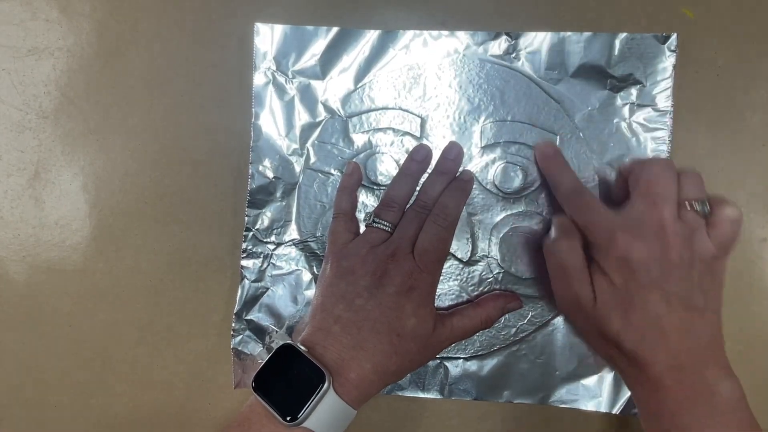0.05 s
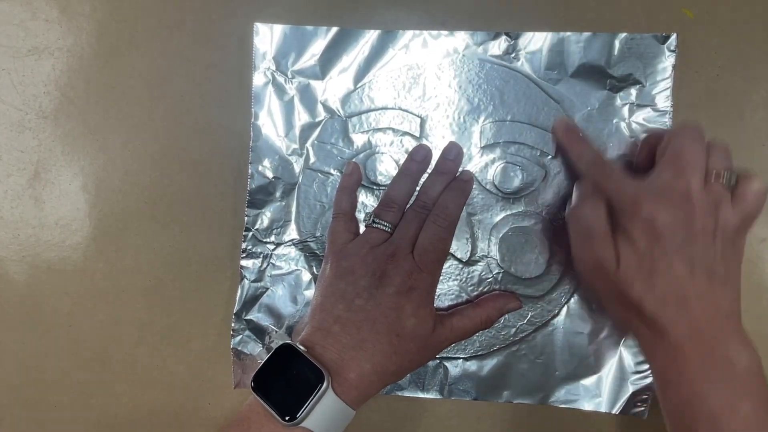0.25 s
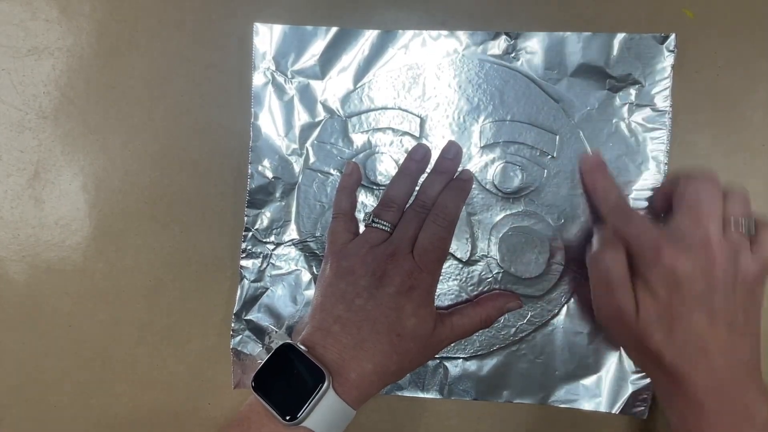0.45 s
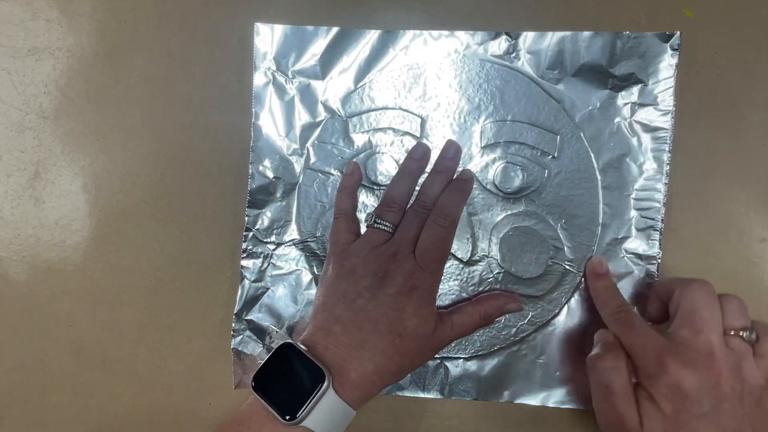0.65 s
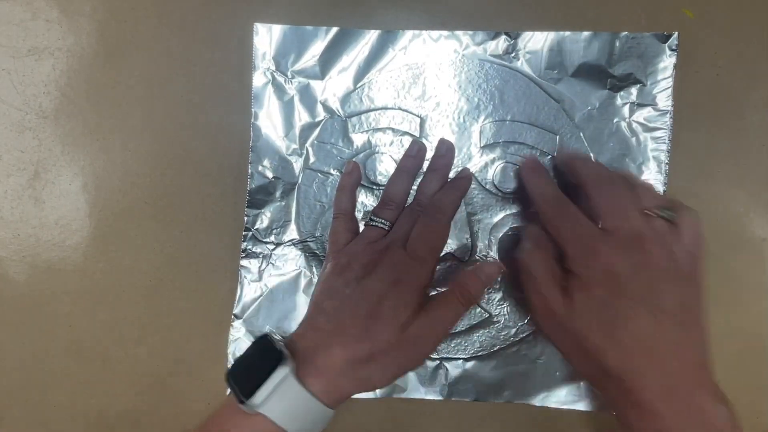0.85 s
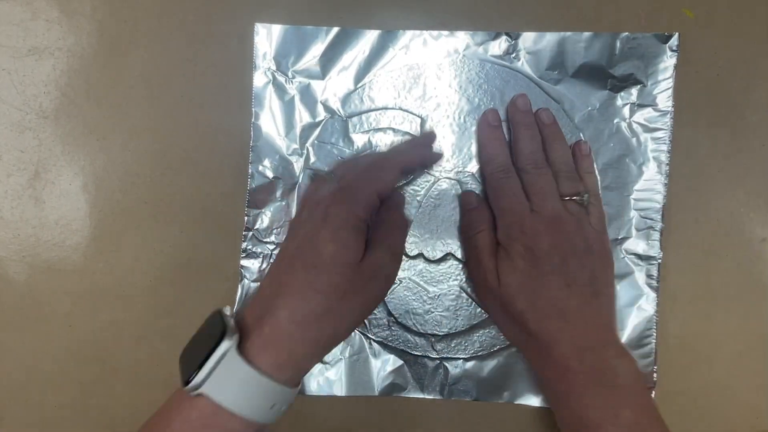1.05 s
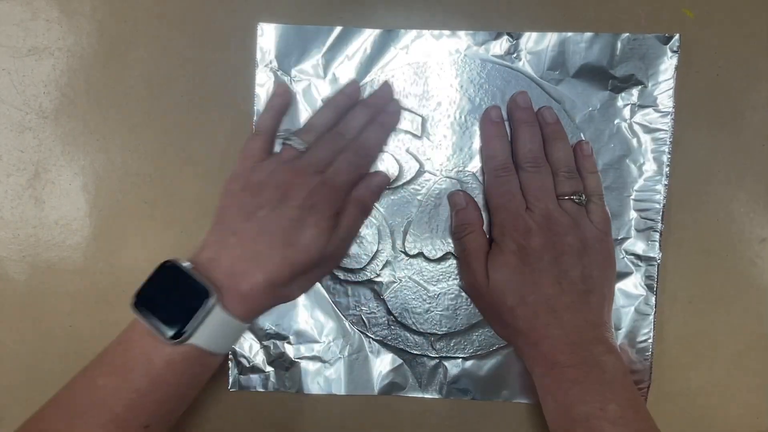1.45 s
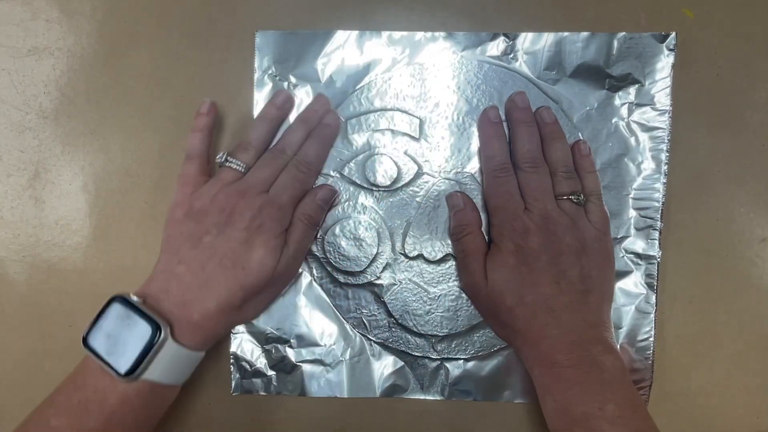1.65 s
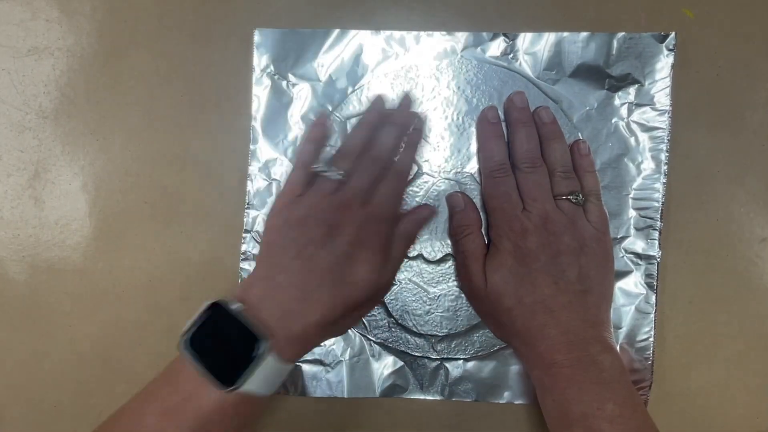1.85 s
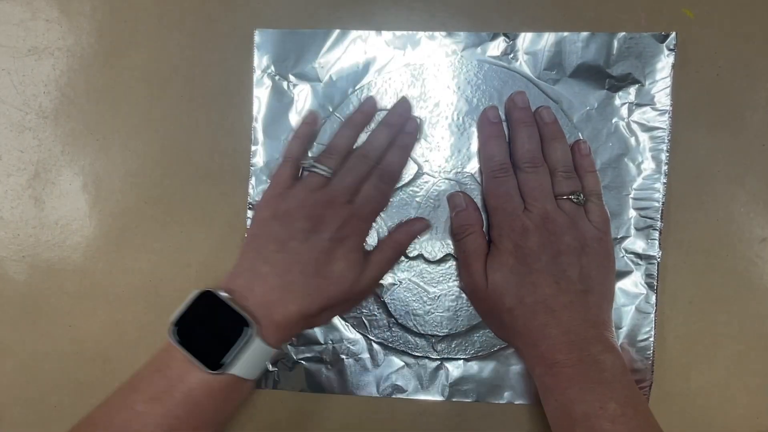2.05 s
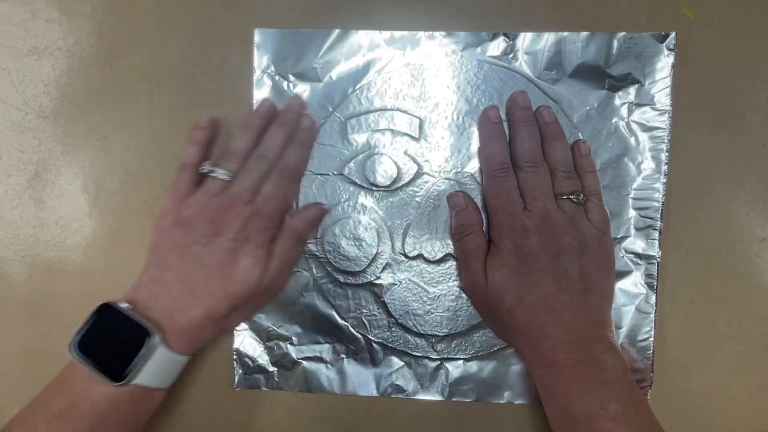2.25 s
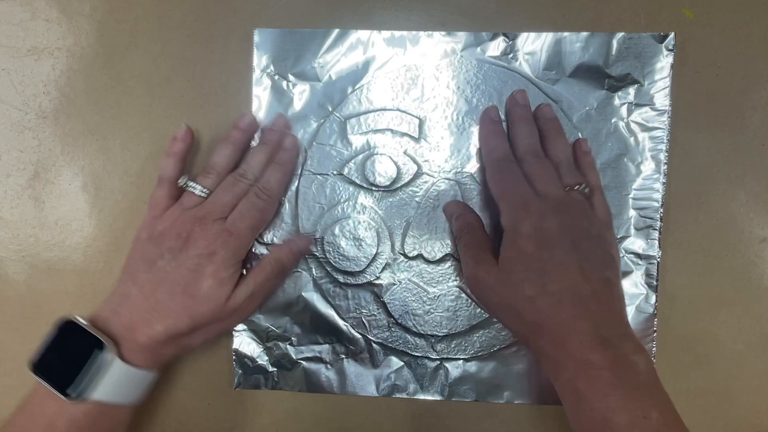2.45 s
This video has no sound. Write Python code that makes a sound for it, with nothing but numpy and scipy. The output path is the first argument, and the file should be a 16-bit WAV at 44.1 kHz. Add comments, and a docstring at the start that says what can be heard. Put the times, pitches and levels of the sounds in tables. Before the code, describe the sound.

Close by in a small, quiet room, foil crinkles under hands rubbing it over a plate in several short strokes. Sharp crackles come throughout, while the table beneath gives an early knock, brief low judders and soft scuffs.

```python
"""Aluminium foil crackles as fingers press and smooth it over a relief plate on a table.
Creases buckle with bright snaps, and skin sliding on the foil makes a fine fizz of tiny slips.
Through the plate the table top knocks, scuffs and judders under the hands.
The room is small and quiet, and two microphone openings listen from close by."""
import sys
import numpy as np
from scipy import signal
from scipy.fft import rfft, irfft
from scipy.io import wavfile

SR = 44100
rng = np.random.default_rng(int(sys.argv[2]) if len(sys.argv) > 2 else 0)


def bounce(signal):
    """Save signal as a 16-bit WAV file at the path given by the first command-line argument."""
    frames = np.transpose(np.atleast_2d(signal))
    limited = np.clip(frames, -1, 1)
    pcm = np.round(limited * 32767).astype(np.int16)
    wavfile.write(sys.argv[1], SR, pcm)


N = 114660


def amp(db):
    """Turns decibels into a number to multiply by."""
    return 10 ** (np.asarray(db) / 20)


def unit_level(x):
    """Scales a signal to an average (rms) level of 1."""
    return x / np.sqrt(np.mean(x ** 2) + 1e-20)


def read_curve(points, hz):
    """Looks up a value between the listed pitches."""
    pitch_hz, value = np.transpose(points)
    return np.interp(np.log(hz + 1), np.log(pitch_hz + 1), value)


def add(mix, start_s, sound):
    """Mixes a sound in at start_s, cutting off what does not fit."""
    at = round(start_s * SR)
    sound = sound[max(-at, 0):]
    part = mix[max(at, 0):][:len(sound)]
    part += sound[:len(part)]


def colour(x, points):
    """Makes some pitches stronger than others; white noise keeps its overall level."""
    size = 4096
    log_gain = np.log(amp(read_curve(points, abs(np.fft.fftfreq(size, 1 / SR)))))
    response = np.exp(np.conj(signal.hilbert(log_gain)))  # rings after a click, never before
    taps = np.fft.ifft(response).real[:size // 2]
    return signal.oaconvolve(x, taps / np.linalg.norm(taps))[:len(x)]


def band(x, centre_hz, octaves):
    """Keeps only the pitches near centre_hz."""
    hz = np.fft.rfftfreq(len(x), 1 / SR) + 1
    bell = np.exp(-.5 * (np.log2(hz / centre_hz) / octaves) ** 2)
    return irfft(rfft(x) * bell, len(x))


def drift(step_s):
    """Glides to a new random value every step_s."""
    values = rng.standard_normal(N)
    return unit_level(np.interp(np.arange(N) / SR / step_s, np.arange(N), values))


def slips(per_s, spread_db):
    """Tiny clicks of uneven size at random times."""
    size = amp(spread_db * np.minimum(rng.exponential(1, N), 5))
    sign = rng.choice([-1., 1.], N)
    happens = rng.random(N) < per_s / SR
    return unit_level(size * sign * happens)


def push(length_s, rise_s):
    """The loudness of one push: a quick rise and a steady fade."""
    t = np.arange(0, length_s, 1 / SR)
    return np.minimum(t / rise_s, 1) * (1 - t / length_s)


# The tone of the quiet room: pitch_hz, relative_db
ROOM_COLOUR = [(20, -28.5), (58, 3), (80, -10), (240, -16.5), (340, -27), (700, -36.5), (2000, -46),
               (2350, -30.5), (2700, -45), (11000, -40.5), (14000, -62.5)]

def room_tone():
    """A faint, steady rumble and hiss."""
    return amp(-63.5) * colour(rng.standard_normal(N), ROOM_COLOUR)


# How long the echo takes to fade by 60 dB: pitch_hz, fade_s
ECHO_FADES = [(100, 0.043), (3000, 0.21), (14000, 0.02)]

def room_echo(x, rise_s=0.00079):
    """The room adds a short blur of echoes, each pitch fading at its own speed."""
    hz, times, noise = signal.stft(rng.standard_normal(SR // 2), SR, nperseg=256)
    fade = amp(-60 * times / read_curve(ECHO_FADES, hz)[:, None])
    tail = signal.istft(noise * fade, SR)[1]
    tail *= np.minimum(np.arange(len(tail)) / SR / rise_s, 1) ** 2
    return signal.fftconvolve(x, tail / np.linalg.norm(tail))[:N]


# How loud the palms are: time_s, level_db
PALM_LEVELS = [(.2, -61.5), (.42, -53.5), (.55, -57.5), (0.898, -58), (1.25, -62), (1.621, -59.5),
               (1.85, -80), (2.05, -54), (2.451, -57.5), (2.6, -78.5)]
# Their dull tone: pitch_hz, relative_db
PALM_COLOUR = [(20, -33.5), (50, -1.5), (125, 3), (250, -8.5), (450, -15), (620, -15.5), (850, -23),
               (4000, -69)]

def palms():
    """Palms moving on the table make a low rumble."""
    level = amp(np.interp(np.arange(N) / SR, *np.transpose(PALM_LEVELS)))
    return level * colour(rng.standard_normal(N), PALM_COLOUR)


# Rough scrapes that ring the table, mostly the plate dragging on it; the rows at 1.029 s and 1.611 s are hands
# bumping the plate, and the row at 1.313 s is a low overtone of the finger judder there: start_s, length_s,
# level_db, pitch_hz, width_octaves
TABLE_SCUFFS = [(0.058, 0.11, -55.5, 925, 0.35), (0.229, 0.24, -52, 405, 0.27),
                (0.23, 0.49, -57, 840, 0.52), (1.029, 0.027, -54, 220.3, 0.17),
                (1.313, 0.12, -57, 237, 0.13), (1.611, 0.15, -57, 262, 0.62),
                (1.994, 0.47, -62.5, 1124, .13), (2.155, 0.17, -47, 192, 0.32),
                (2.156, 0.15, -40.5, 441, 0.3), (2.205, 0.11, -39.5, 535, 0.36)]

def table_scuffs():
    """Coarse slips make the table ring with a rough pitch: mostly the plate shifting, sometimes a hand bump or
    a judder's overtone."""
    out = np.zeros(N)
    for start_s, length_s, level_db, pitch_hz, width_octaves in TABLE_SCUFFS:
        shape = push(length_s, rise_s=0.00083)
        scrape = band(slips(per_s=900, spread_db=2.5)[:SR // 2], pitch_hz, width_octaves)
        add(out, start_s, amp(level_db) * shape * unit_level(scrape[:len(shape)]))
    return out


# Drags that shake the table near its lowest note: start_s, length_s, level_db, pitch_hz
FINGER_JUDDERS = [(.225, 0.23, -36, 139), (1.1, 0.081, -39.5, 139), (1.318, 0.14, -35, 143.7)]

def finger_judders(waver=0.029):
    """A dragged finger sticks and slips, keeping the table humming for a moment."""
    out = np.zeros(N)
    for start_s, length_s, level_db, pitch_hz in FINGER_JUDDERS:
        wavering_hz = pitch_hz * (1 + waver * drift(step_s=0.015))
        hum = np.sin(2 * np.pi * np.cumsum(wavering_hz) / SR)
        shape = push(length_s, rise_s=0.012)
        add(out, start_s, amp(level_db) * shape * hum[:len(shape)])
    return out


# The notes the table top rings at: pitch_hz, relative_db, fade_s (to fall by 60 dB)
TABLE_NOTES = [(136.7, -2, 0.17), (357, -12.5, 0.086), (407, 2.5, 0.032), (470, -12.5, 0.087),
               (781, -11.5, 0.051), (858, -7, 0.039), (1260, -15.5, 0.016)]
# Fingers knocking on the plate: start_s, level_db, brightness_db_per_octave
FINGER_KNOCKS = [(-.003, -34, -17), (.057, -43, 2), (0.2263, -30, -1), (0.3298, -13, 0.33), (0.893, -43, 2),
                 (2.1555, -41.5, 6), (2.206, -45.5, 5)]

def finger_knocks(rise_s=0.00085, build_cycles=0.63):
    """Each knock rings the table top; low notes take longer to build."""
    out, t = np.zeros(N), np.arange(SR // 3) / SR
    lowest_hz = TABLE_NOTES[0][0]
    for start_s, level_db, brightness in FINGER_KNOCKS:
        for pitch_hz, relative_db, fade_s in TABLE_NOTES:
            note_db = level_db + relative_db + brightness * np.log2(pitch_hz / lowest_hz)
            rise = (1 - np.exp(-t / (rise_s + build_cycles / pitch_hz))) ** 2
            shape = rise * amp(note_db - 60 * t / fade_s)
            add(out, start_s, shape * np.sin(2 * np.pi * pitch_hz * t))
    return out


def with_body(x, body_db):
    """Turns the middle pitches up or down: larger patches of foil give off more of them."""
    return x + band(x * (amp(body_db) - 1), centre_hz=1940, octaves=0.92)


def foil_ring(x, patches=20, ring_s=0.001, evenness=0.9):
    """Clicks ring the sheet briefly; the ring changes as the fingers reach other patches."""
    out, t = np.zeros(N), np.arange(SR // 60) / SR
    touched = rng.integers(0, patches, N)[np.arange(N) // 200]  # a random patch every 200 samples
    for patch in range(patches):
        spectrum = rfft(rng.standard_normal(len(t)) * np.exp(-t / ring_s), 2 * len(t))
        ring = irfft(spectrum / abs(spectrum) ** evenness)[:len(t)]  # no one pitch sticks out
        out += signal.oaconvolve(x * (touched == patch), ring / np.linalg.norm(ring))[:N]
    return out


def foil_rasp(start_s=0.525, length_s=0.12, level_db=-41):
    """A fingertip traces the rim, and its slips ring the tight foil at one high pitch."""
    out, swell = np.zeros(N), np.hanning(round(length_s * SR))
    ring = unit_level(band(slips(per_s=13000, spread_db=1), centre_hz=5480, octaves=0.055))
    add(out, start_s, amp(level_db) * swell * ring[:len(swell)])
    return out


# Fingers sliding on the foil, one list per stroke: time_s, level_db, body_db (middle pitches)
RUB_STROKES = [
    [(.058, -53.5, 2.5), (.135, -58, -2), (.165, -71, 5)],
    [(.226, -60, 5.5), (.3, -51.5, 1.5), (.365, -90, 20), (.41, -52.5, -4.5), (.53, -47, 7),
     (.558, -39, -5), (.605, -33, -10.5), (.64, -43.5, -2), (.675, -62.5, 4), (.74, -57.5, 3.5)],
    [(.74, -52.5, 6), (.875, -51.5, 19), (.935, -42, 1), (.95, -56.5, -7), (1, -54.5, 4), (1.06, -62, 0)],
    [(1.06, -67, 15), (1.09, -66, 17), (1.14, -54, 8), (1.2, -77.5, 8), (1.245, -54.5, 3),
     (1.28, -84.5, 12)],
    [(1.305, -72, 13), (1.37, -58.5, 9.5), (1.445, -60.5, 4), (1.472, -44.5, 5), (1.61, -47.5, 4),
     (1.72, -58, 1), (1.8, -65.5, 16), (1.835, -94.5, 11)],
    [(1.957, -59, -14), (2, -54.5, 15), (2.08, -52, 5), (2.14, -54.5, 2), (2.165, -49, 8.5),
     (2.24, -44, 10), (2.33, -49.5, -0.5), (2.39, -50, 3.5), (2.42, -66.5, 15), (2.5, -61.5, -3),
     (2.54, -89, -6)],
]
# The bright tone of the fizz: pitch_hz, relative_db
FIZZ_COLOUR = [(400, -21), (850, -20.5), (1350, -12.5), (3200, -14.5), (4400, -11.5), (5700, -7),
               (9300, -2), (10700, 3), (11600, -5.5), (12600, -18.5), (13700, -25.5), (16000, -46.5)]

def foil_rubbing(grip_waver_db=1.7):
    """Skin slides over the wrinkles in thousands of slips, its grip wavering."""
    t, level, body = np.arange(N) / SR, np.zeros(N), np.zeros(N)
    for stroke in RUB_STROKES:
        time_s, level_db, body_db = np.transpose(stroke)
        sliding = (t >= time_s[0]) & (t < time_s[-1])
        level[sliding] = amp(np.interp(t[sliding], time_s, level_db))
        body[sliding] = np.interp(t[sliding], time_s, body_db)
    fizz = slips(per_s=13000, spread_db=1) * level
    fizz *= amp(grip_waver_db * drift(step_s=0.0067))
    return colour(foil_ring(with_body(fizz, body)), FIZZ_COLOUR)


# Creases buckling: start_s, level_db, decay_s (to fall to about a third), body_db (middle pitches)
CREASE_SNAPS = [(0.0572, -49, 0.00079, 0), (0.3103, -40, 0.011, -3), (0.3277, -37.5, 0.0065, 5),
                (0.3784, -28.5, 0.0038, -13.5), (0.478, -27.5, 0.0023, -20), (0.519, -28, 0.002, -6),
                (0.741, -31, 0.0054, -4.5), (0.7738, -44.5, 0.011, 9), (.829, -35, 0.0083, 7),
                (.842, -32.5, 0.0073, 10.5), (0.8846, -26, 0.0061, -4), (0.8918, -18, .011, 1),
                (0.9054, -25, 0.017, -20), (0.9575, -34, .007, -1), (0.9636, -30.5, 0.0091, -2),
                (1.0088, -44, 0.0022, 9), (1.0929, -38.5, 0.0063, 3), (1.1091, -32.5, 0.0072, -3),
                (1.1692, -30, 0.0016, -4), (1.2225, -42.5, 0.0053, 1.5), (1.3093, -44, 0.00083, 7.5),
                (1.408, -53.5, 0.0015, 21.5), (1.5927, -36, 0.012, 2.5), (1.612, -25.5, 0.00088, -9.5),
                (1.6552, -41.5, 0.0059, 3), (1.7385, -48.5, 0.011, -1), (1.7805, -47, 0.0051, 10),
                (1.9511, -34.5, 0.022, 0), (1.9923, -38, 0.004, 10), (2.0133, -26.5, 0.0047, 1.5),
                (2.0484, -34, 0.0024, 8.5), (2.0661, -40, 0.017, 6), (2.104, -35, 0.011, -0.5),
                (2.1541, -26, 0.0079, -10), (2.2228, -32, 0.0067, -21), (2.236, -32.5, 0.0035, -19),
                (2.308, -27.5, 0.016, -20), (2.346, -39, 0.0019, 10), (2.373, -31, 0.0046, 2),
                (2.45, -45.5, 0.0032, 10.5), (2.494, -43.5, 0.0044, 1.5)]
# The bright tone of a snap: pitch_hz, relative_db
CREASE_COLOUR = [(100, -28.5), (650, -21.5), (1200, -15), (3100, -10.5), (4500, -5.5), (6000, -3.5),
                 (9300, -3), (10700, -0.5), (11700, -8), (12600, -16), (13500, -32.5), (16000, -55)]

def foil_snaps(crack_db=-17, boost_db=0.5):
    """A crease gives way with one crack and a quickly dying rattle of smaller ones."""
    out, t = np.zeros(N), np.arange(SR // 10) / SR
    rattle = slips(per_s=9000, spread_db=3)
    lead = SR // 100  # silence in front, as with_body spreads a click both ways in time
    for start_s, level_db, decay_s, body_db in CREASE_SNAPS:
        pick = int(rng.random() * (N - len(t)))
        snap = rattle[pick:pick + len(t)] * np.exp(-t / decay_s)
        snap /= np.linalg.norm(snap) + 1e-12
        snap[0] += amp(crack_db)
        strength = amp(level_db + boost_db) * np.sqrt(decay_s * SR / 2)  # longer means more energy
        snap *= strength / np.linalg.norm(snap)
        add(out, start_s - lead / SR, with_body(np.pad(snap, (lead, 0)), body_db))
    return colour(foil_ring(out), CREASE_COLOUR)


def scene(shared_echo_db=-17.5, side_echo_db=-11.5):
    """Foil and table sit in the middle; left and right each add an echo of their own."""
    foil = foil_snaps() + foil_rubbing() + foil_rasp()
    scuffs = table_scuffs()
    middle = foil + scuffs + finger_knocks() + finger_judders() + palms() + room_tone()
    middle += amp(shared_echo_db) * room_echo(foil)
    sides = np.array([room_echo(foil + scuffs + palms() + room_tone()) for _ in range(2)])
    return middle + amp(side_echo_db) * sides


# How far the left microphone opening is ahead of the right: pitch_hz, lead_radians
LEFT_LEAD = [(450, -.1), (620, 1.8), (1050, .1), (2000, .2), (3900, 1), (4700, 2.6), (5250, 5.1),
             (7900, 8.7), (9500, 9.35), (11900, 12.3)]
# How much louder the left one is: pitch_hz, left_minus_right_db
LEFT_BALANCE = [(150, -2.2), (700, .3), (4400, -1.4), (8000, -.3)]

def record(dry, top_hz=16200):
    """The two openings hear each pitch with their own timing and level, up to top_hz."""
    hz = np.fft.rfftfreq(2 * N, 1 / SR)
    left = amp(read_curve(LEFT_BALANCE, hz) / 2) * np.exp(.5j * read_curve(LEFT_LEAD, hz))
    right = 1 / left
    stereo = irfft(rfft(dry, 2 * N) * np.array([left, right]))[:, :N]
    treble_cut = signal.firwin(511, top_hz, window=("kaiser", 9), fs=SR)
    return signal.oaconvolve(stereo, treble_cut[None], "same")


dry = scene()
out = record(dry)
bounce(out)
```